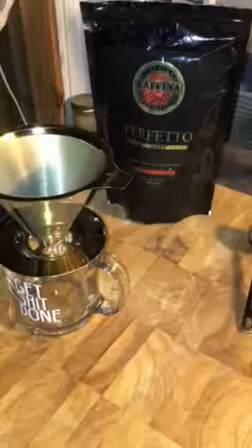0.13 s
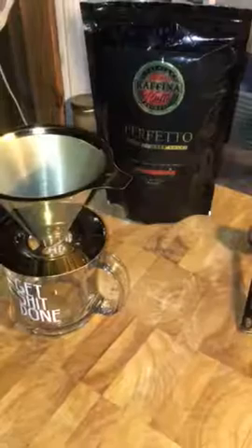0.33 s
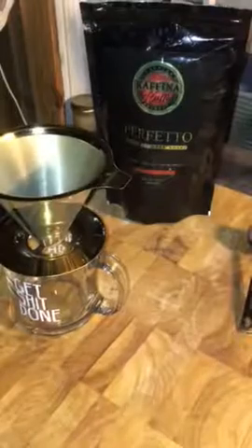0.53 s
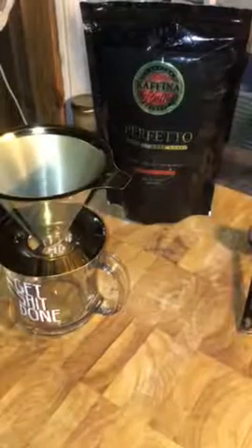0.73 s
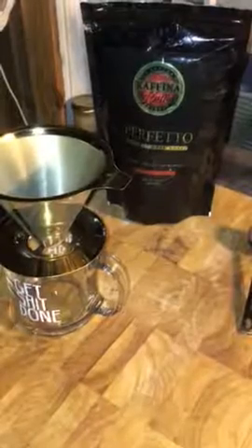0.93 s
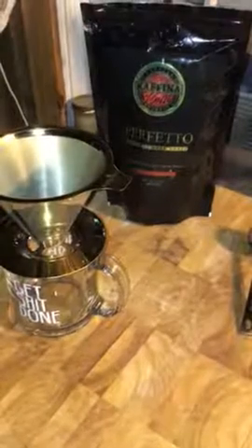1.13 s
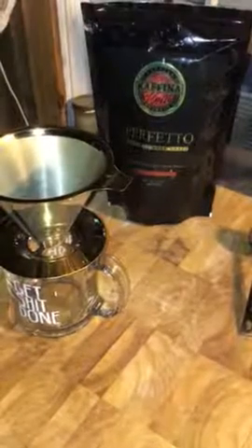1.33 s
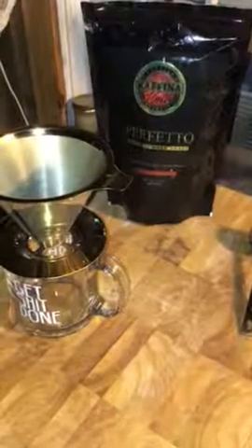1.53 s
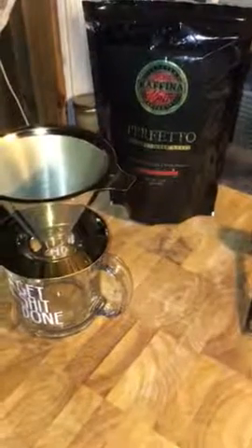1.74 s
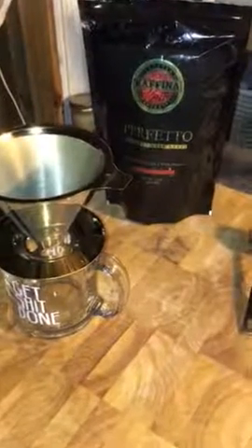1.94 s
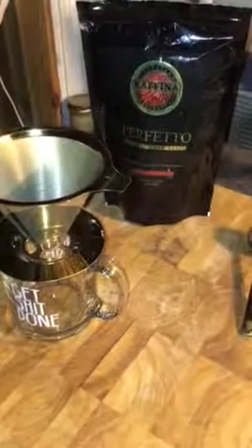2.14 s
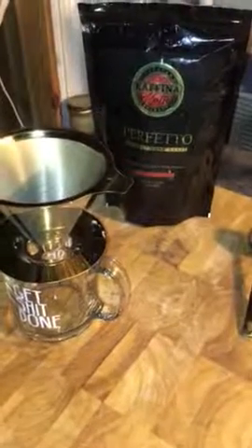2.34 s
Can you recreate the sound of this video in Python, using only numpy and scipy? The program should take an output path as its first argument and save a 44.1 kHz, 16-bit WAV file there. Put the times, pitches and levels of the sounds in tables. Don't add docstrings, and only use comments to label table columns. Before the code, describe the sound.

A kettle coming to the boil whistles, high, breathy and wavering, over hissing steam in a kitchen

```python
import sys
import numpy as np
from scipy import signal
from scipy.fft import rfft, irfft, next_fast_len
from scipy.io import wavfile
from scipy.ndimage import uniform_filter1d

SR = 44100
rng = np.random.default_rng(int(sys.argv[2]) if len(sys.argv) > 2 else 0)


def nominal_scale(level):
    x = np.asarray(level, float) / 20
    return 10 ** x


def to_wav(s):
    ch = np.atleast_2d(s).T
    pcm = np.round(np.clip(ch, -1, 1) * 32767)
    wavfile.write(sys.argv[1], SR, pcm.astype(np.int16))


N = 105884
EFFORT_REF_DB = -55
SURGE_EDGE_S = .009


def evened(x):
    return x / np.sqrt(np.mean(x ** 2) + 1e-20)


def read(points, hz):
    f, value = np.transpose(points)
    return np.interp(np.log(hz + 1), np.log(f + 1), value, left=-90)


def drift(top_hz, low_hz=0.):
    n = next_fast_len(N)
    hz = np.fft.rfftfreq(n, 1 / SR) + 1e-3
    spectrum = rfft(rng.standard_normal(n))
    spectrum = spectrum / (1 + (hz / top_hz) ** 4) / (1 + (low_hz / hz) ** 2)
    return evened(irfft(spectrum, n)[:N])


def gate(t, start, length, edge):
    return .5 * (np.tanh((t - start) / edge) - np.tanh((t - start - length) / edge))


def turns(hz):
    return 2 * np.pi * np.cumsum(hz) / SR


def fuzz(phase, width):
    return np.cos(phase) * drift(width / 2) + np.sin(phase) * drift(width / 2)


def wash(spectrum, patch_db, wide):
    frames, hz = N // 512 + 6, np.fft.rfftfreq(2048, 1 / SR)
    a, b, patches = rng.standard_normal((frames, 1025, 3)).T
    patches = uniform_filter1d(patches, wide, axis=0)
    patches = evened(uniform_filter1d(patches, size=4, axis=1))
    z = (a + 1j * b) * nominal_scale(read(spectrum, hz)[:, None] + patch_db * patches)
    return evened(signal.istft(z, nperseg=2048, noverlap=1536)[1][:N])


# start_s, pitch_hz of the main stage
FLOW = [(.08, 2700), (.22, 2570), (.3, 2720), (.41, 2620), (.5, 2470), (.6, 2650), (.9, 2750), (1.13, 2630),
        (1.3, 2830), (1.55, 2940), (1.7, 2930), (1.88, 3050), (2.1, 3065), (2.4, 3080)]
FLOW_EFFORT = [-51.5, -62, -52.5, -61.5, -61.5, -58, -58, -58, -58, -56, -57, -50, -48, -45.5]
# start_s, length_s, lift_hz
SURGES = [(.095, .1, 170), (.235, .03, 230), (.305, .105, 180), (.52, .05, 500), (.6, .065, 270),
          (.705, .025, 250), (.735, .115, 250), (.955, .04, 320), (1.0, .075, 290), (1.155, .045, 180),
          (1.2, .04, 480), (1.25, .04, 440), (1.365, .07, 230), (1.51, .02, 110), (1.59, .07, 115),
          (1.675, .02, 250), (1.735, .11, 330), (1.895, .16, 270), (2.145, .08, 255), (2.278, .14, 245)]
SURGE_EFFORT = [0.56, 1.2, 3.2, 1.8, 1.4, 1.3, 0.73, 4.1, 2.9, 1.5, 7.3, 5.1, 4.8, 3.7, 8.2, 2.3, 2.6, 3,
                3.1, 2.6]


def steam():
    t = np.arange(N) / SR
    s, hz = np.transpose(FLOW)
    db, surge = np.interp(t, s, FLOW_EFFORT), 0
    for (start, length, lift_hz), extra_db in zip(SURGES, SURGE_EFFORT):
        on = gate(t, start, length, SURGE_EDGE_S / 2)
        surge = surge + lift_hz * on
        db = db + extra_db * on
    return np.interp(t, s, hz) + surge, db, surge


# pitch_hz when the main stage is at 3000 Hz, slope against it,
# clean_share (0-1), flutter_db
STAGE_LAWS = [
    (1345, .3, .8, 3),
    (1620, .45, .75, 4),
    (2640, .8, .75, 4),
    (3000, 1, .9, 3.5),
    (4650, 1.55, .6, 4),
]
# level_db, effort_share (dB per dB), fuzz_width_hz
STAGE_LEVELS = [(-11, 0.025, 42), (-5, -0.37, 350), (-15.5, 0.1, 110), (-3.5, 0.58, 480),
                (-16.5, 0.49, 570)]


def whistle(hz, db):
    effort = db - EFFORT_REF_DB
    loose = nominal_scale(-.9 * effort)
    hz, out = hz * (1 + .013 * loose * drift(50, 12)), 0
    rooms = [1, free(PEEPS), 1, free(BEATS), 1]
    for law, strength, room in zip(STAGE_LAWS, STAGE_LEVELS, rooms):
        mid_hz, slope, clean, flutter_db = law
        stage_db, follow, width = strength
        own_waver = .009 / slope * loose ** slope * drift(50, 10)
        phase = turns((mid_hz + slope * (hz - 3000)) * (1 + own_waver))
        tone = np.sqrt(2 * clean) * np.sin(phase) + np.sqrt(1 - clean) * fuzz(phase, width)
        flutter = flutter_db * np.minimum(drift(42.3, 41), 1)
        out = out + room * tone * nominal_scale(EFFORT_REF_DB + stage_db + follow * effort + flutter)
    return metal(out, 0.65)


def free(notes):
    t = np.arange(N) / SR
    edge = SURGE_EDGE_S
    locked = sum(gate(t, s - edge, length + 2 * edge, edge / 2) for s, length, hz, db in notes)
    return nominal_scale(-9 * np.minimum(locked, 1))


BELLY_HZ = [1310, 1465, 1550, 1678, 1800, 1870]
# width_hz, level_db
BELLY_RING = [(40.8, 2.8), (47.3, 1.3), (62, 8.6), (38, 9.4), (34.7, 4.6), (43.4, 6.5)]
SPOUT_HZ = [2400, 2520, 2606, 2765, 2850, 2930, 3064, 3140, 3210, 3290, 3328, 3474]
# width_hz, level_db
SPOUT_RING = [(49.4, 4.3), (51, 1.8), (24.4, 15), (40, 10.6), (40.6, 11), (30.3, 15), (25.3, 13), (26, 16),
              (31.2, 2.7), (25.3, 10.9), (32.4, 1.8), (15.8, 2.7)]
LID_HZ = [3840, 4355, 4550, 4673, 4780, 5010, 5120, 5250, 5420]
# width_hz, level_db
LID_RING = [(39.7, 22.5), (39.3, 12.6), (35, 2.1), (40.2, 10.5), (39.8, 5), (45, 13), (38.6, 1.6),
            (45, 2.2), (30, 2.9)]


def metal(x, direct):
    hz = np.fft.rfftfreq(N, 1 / SR)
    modes = zip(BELLY_HZ + SPOUT_HZ + LID_HZ, BELLY_RING + SPOUT_RING + LID_RING)
    ring = sum(nominal_scale(db) / (1 + 2j * (hz - f) / w) for f, (w, db) in modes)
    hollow_db = -26 * np.exp(-((hz - 3950) / 330) ** 4)
    return irfft(rfft(x) * (direct + 0.36 * ring) * nominal_scale(hollow_db), N)


# pitch_ratio, width_hz, level_db, effort_share (dB per dB),
# surge_gain_db per 100 Hz of surge
RASPS = [
    (.5, 480, -14.5, 0.51, 3),
    (1.04, 880, -16.5, 0.68, 5),
    (1.601, 980, -17, 0.17, -2.5),
]


def rasp(hz, db, surge):
    phase, out = turns(hz), 0
    for ratio, width, rasp_db, follow, gain in RASPS:
        level = EFFORT_REF_DB + rasp_db + follow * (db - EFFORT_REF_DB)
        level = level + gain * np.minimum(surge, 300) / 100 + 4.5 * drift(38.0, 17)
        out = out + fuzz(ratio * phase, width) * nominal_scale(level)
    return metal(out, 0.24)


# start_s, length_s, pitch_hz, level_db
PEEPS = [(0.206, 0.04, 1470, -48.5), (0.465, 0.025, 1470, -48), (0.523, 0.0071, 1530, -44),
         (0.563, 0.022, 1520, -50.5), (0.633, 0.006, 1580, -46), (0.673, 0.027, 1510, -49.5),
         (0.743, 0.017, 1860, -52), (0.86, 0.031, 1500, -50), (0.902, 0.0066, 1500, -47),
         (0.954, 0.0067, 1510, -47), (1.086, 0.013, 1550, -50), (1.114, 0.015, 1490, -50),
         (1.301, 0.011, 1560, -52), (1.351, 0.011, 1840, -49), (1.838, 0.015, 1790, -53.5),
         (1.896, 0.0074, 1800, -50), (1.974, 0.01, 1480, -54), (1.976, 0.017, 1800, -52.5),
         (2.018, 0.011, 1700, -66), (2.117, 0.0081, 1700, -49), (2.137, 0.018, 1800, -51.5),
         (2.169, 0.022, 1490, -55), (2.171, 0.015, 1820, -52), (2.203, 0.009, 1540, -53),
         (2.287, 0.053, 1800, -54.5), (2.295, 0.018, 1470, -52.5), (2.349, 0.03, 1820, -53.5),
         (2.357, 0.017, 1480, -60)]
# start_s, length_s, pitch_hz, level_db
BEATS = [(0.108, 0.015, 2840, -49.5), (0.153, 0.017, 2770, -49.5), (0.186, 0.013, 2693, -53),
         (0.243, 0.011, 2850, -47.5), (0.311, 0.015, 2860, -48.5), (0.348, 0.0084, 2840, -49),
         (0.542, 0.018, 3070, -52), (0.626, 0.012, 2830, -50.5), (0.653, 0.0062, 2840, -46.5),
         (0.711, 0.0075, 3030, -48), (0.722, 0.0065, 2820, -45), (0.738, 0.009, 3276, -51),
         (0.76, 0.0084, 2850, -50), (0.836, 0.011, 2890, -53.5), (0.927, 0.011, 2790, -48.5),
         (0.975, 0.019, 3070, -53.5), (1, 0.01, 2870, -50), (1.047, 0.0097, 3040, -49),
         (1.062, 0.028, 2850, -52.5), (1.164, 0.0056, 2836, -46.5), (1.189, 0.031, 3024, -56),
         (1.206, 0.02, 3210, -52.5), (1.234, 0.016, 2750, -51), (1.253, 0.02, 3240, -51.5),
         (1.275, 0.009, 2760, -49), (1.34, 0.021, 2880, -54), (1.382, 0.017, 3010, -51),
         (1.409, 0.026, 3110, -49), (1.515, 0.017, 3054, -49.5), (1.53, 0.011, 2830, -52),
         (1.589, 0.051, 3045, -50), (1.738, 0.0095, 3280, -44.5), (1.764, 0.016, 3310, -44.5),
         (1.808, 0.022, 3307, -48), (1.93, 0.013, 3330, -43), (1.964, 0.0083, 3310, -38),
         (1.977, 0.027, 3350, -47.5), (2.05, 0.0082, 3346, -42), (2.08, 0.036, 3047, -46.5),
         (2.152, 0.012, 3293, -42.5), (2.172, 0.051, 3297, -44.5), (2.284, 0.021, 3357, -44),
         (2.317, 0.0054, 3226, -38), (2.358, 0.0072, 3290, -39)]
# start_s, length_s, pitch_hz, level_db
THREADS = [
    (0.69, 0.046, 1310, -60.5),
    (2.061, 0.077, 1309, -60.5),
    (0.1, 0.079, 4360, -75),
    (2.225, 0.063, 1500, -58),
]


def peeps():
    t, out = np.arange(N) / SR, 0
    wobble = turns(19 * drift(55))
    for s, length, hz, db in [*PEEPS, *BEATS, *THREADS]:
        tone = np.sin(2 * np.pi * hz * t + wobble * hz / BEAD_HZ[0] * 2)
        out = out + np.sqrt(2) * nominal_scale(db) * gate(t, s, length, .004) * tone
    return out


BEAD_HZ = [3328, 4673]
# start_s, length_s, spout_level_db, lid_level_db
BEADS = [(0.146, 0.018, -63, -71), (0.308, 0.015, -61, -86), (0.36, 0.022, -59.5, -66),
         (0.429, 0.016, -86, -66), (0.607, 0.019, -72, -60.5), (.64, 0.015, -63, -69),
         (0.71, .016, -65, -64), (0.748, 0.02, -55.5, -59), (0.794, 0.048, -68, -63),
         (0.957, 0.05, -63.5, -66), (1.039, 0.033, -65, -63), (1.2, 0.037, -71, -66),
         (1.337, 0.041, -64, -62), (1.77, 0.015, -60, -56.5), (2.371, 0.033, -70, -61)]


def beads():
    t, out = np.arange(N) / SR, 0
    for k, hz in enumerate(BEAD_HZ):
        level = sum(nominal_scale(row[2 + k]) * gate(t, row[0], row[1], 0.0057) for row in BEADS)
        phase = 2 * np.pi * hz * t + turns(16.8 * drift(54.0))
        out = out + level * np.sqrt(2) * np.sin(phase) * nominal_scale(2.0 * drift(45.0, 21))
    return out


# pitch_hz, level_db per Hz
HISS = [(3290, -37), (5600, -3), (6960, 0), (7620, -3), (8230, 0.5), (9590, 0), (11500, -2.5), (15600, -11)]
# pitch_hz, level_db per Hz
SEETHE = [(800, -12.5), (1200, -7.5), (2000, -6), (3300, -11), (3700, -13), (4200, -14), (5600, -18),
          (7000, -44)]
# start_s (peak), half_length_s, gain_db
PUFFS = [
    (0.168, 0.013, 2),
    (.32, 0.013, 1.5),
    (0.592, 0.017, 2.5),
    (0.723, 0.012, 5.5),
    (1.336, 0.017, 3),
]


def hiss(db):
    t = np.arange(N) / SR
    puffs = sum(p * np.exp(-((t - s) / w) ** 2) for s, w, p in PUFFS)
    flicker = 0.72 * drift(65.0, low_hz=2.7)
    level = 0.067 * (db - EFFORT_REF_DB) + flicker + puffs
    bright = nominal_scale(-67.5 + level) * wash(HISS, 0.98, wide=30)
    return bright + nominal_scale(-62 + 1.44 * level) * wash(SEETHE, 3.8, wide=12)


# pitch_hz, level_db per Hz
BOIL = [(27, -40), (38, -10), (164, -4), (280, -8.5), (315, -12.5), (565, -20), (760, -15), (870, -20),
        (1300, -18.5), (1500, -41.5)]
# pitch_hz, width_hz, level_db
DRONE = [(37.86, 31, -63.5), (61.66, 17, -62), (83, 10.8, -61.5), (103.3, 5.6, -66), (122.4, 18, -64),
         (158.4, 21, -62.5), (180.7, 24.4, -62), (277, 49, -73), (363.6, 34, -71)]


def boil():
    t = np.arange(N) / SR
    hum = sum(nominal_scale(db) * fuzz(2 * np.pi * hz * t, w) for hz, w, db in DRONE)
    rumble = nominal_scale(-53 - 4.5) * wash(BOIL, 0.96, wide=6)
    return rumble * nominal_scale(1.33 * drift(12.7)) + hum * nominal_scale(1.8 * drift(11.0))


def kitchen(x):
    at = np.arange(200, SR // 2, 22)
    taps = np.zeros(SR // 2 + 22)
    signs = rng.choice([-1., 1.], len(at))
    taps[at + rng.integers(0, 22, len(at))] = signs * nominal_scale(-60 * at / SR / .25)
    return signal.fftconvolve(x, taps / np.linalg.norm(taps))[:N]


def scene():
    hz, db, surge = steam()
    jet = whistle(hz, db) + rasp(hz, db, surge) * np.sqrt(free(BEATS))
    kettle = jet + peeps() + beads()
    return (kettle + nominal_scale(-9) * kitchen(kettle) + hiss(db) + boil())[None]


def low_pass(x):
    return signal.sosfilt(signal.butter(12, 15700, fs=SR, output="sos"), x)


def record(dry):
    low_cut = signal.butter(4, 36, "high", fs=SR, output="sos")
    heard = signal.sosfilt(low_cut, dry)
    opened = np.arange(N) >= .0842 * SR
    return low_pass(heard * opened)


dry = scene()
out = record(dry)
to_wav(out)
```